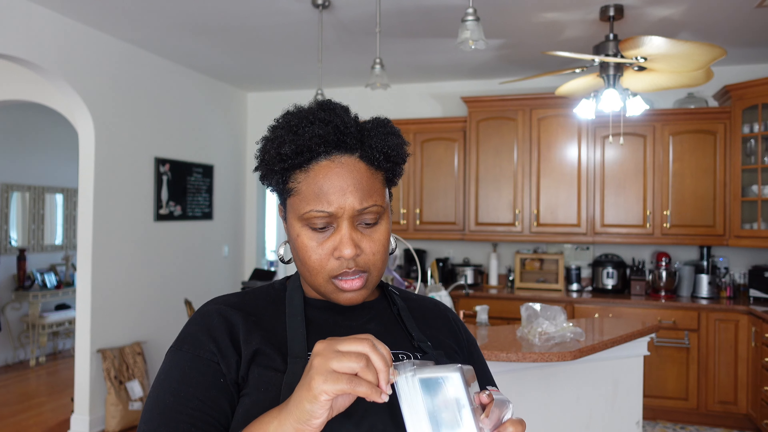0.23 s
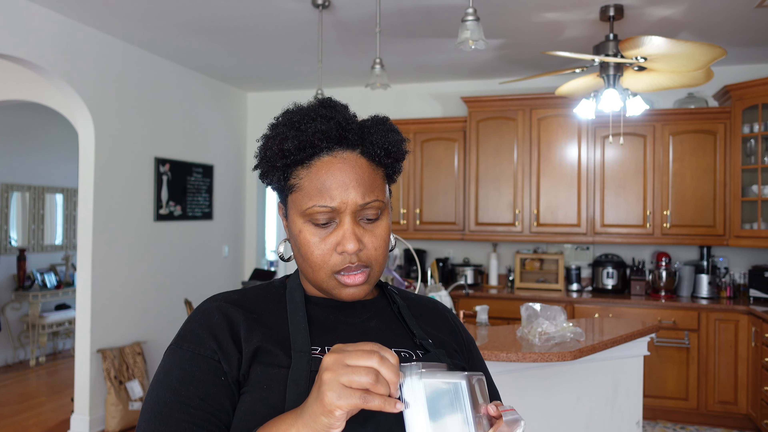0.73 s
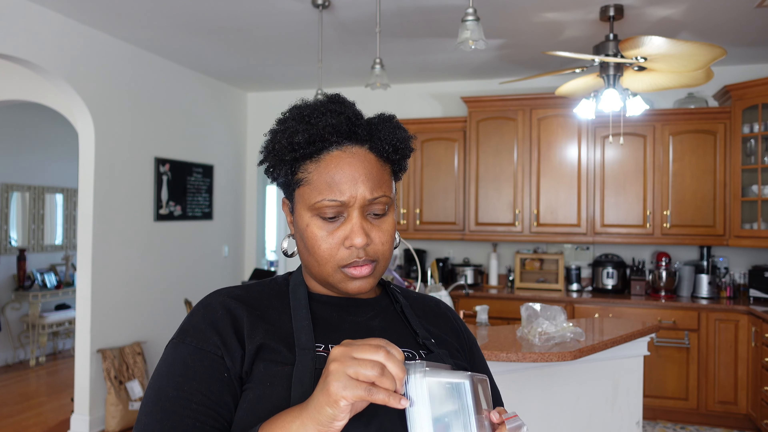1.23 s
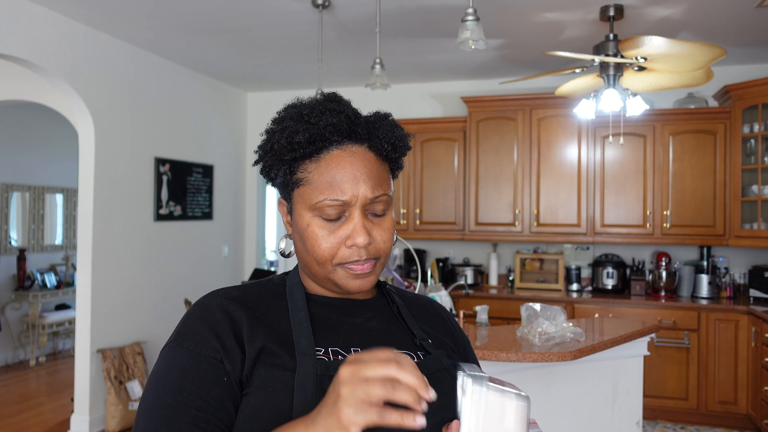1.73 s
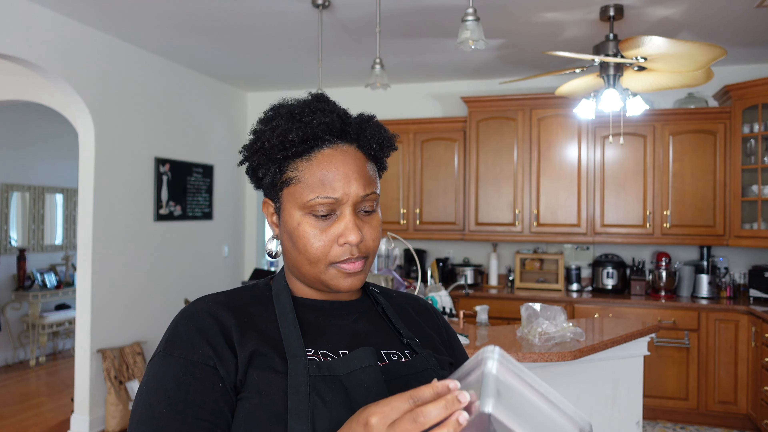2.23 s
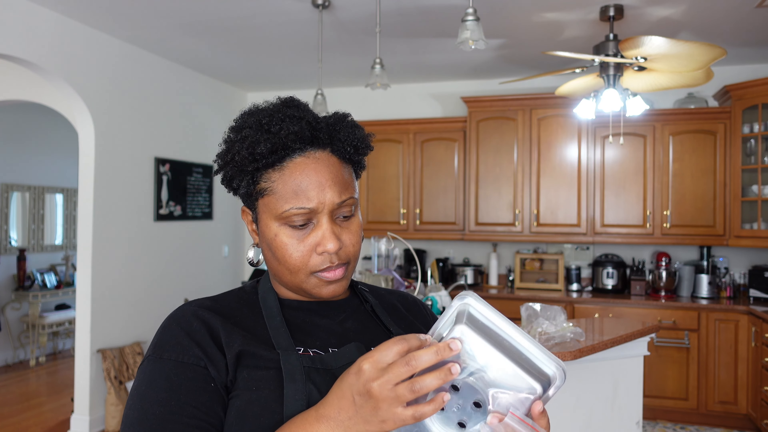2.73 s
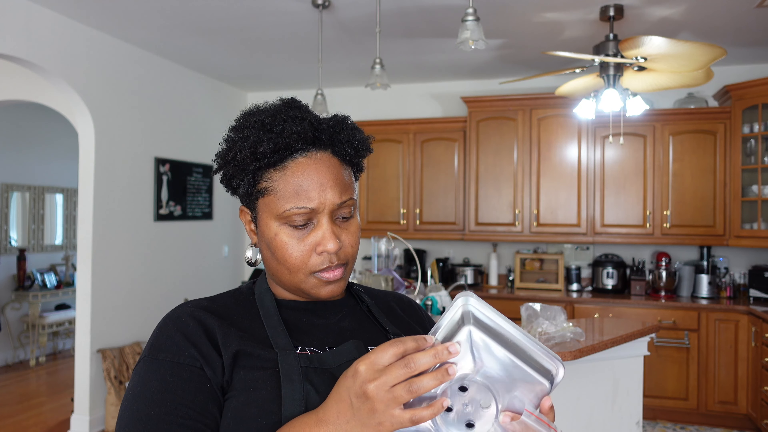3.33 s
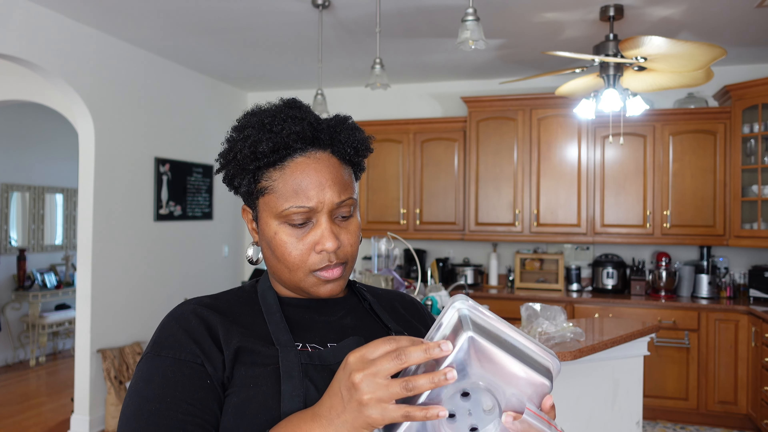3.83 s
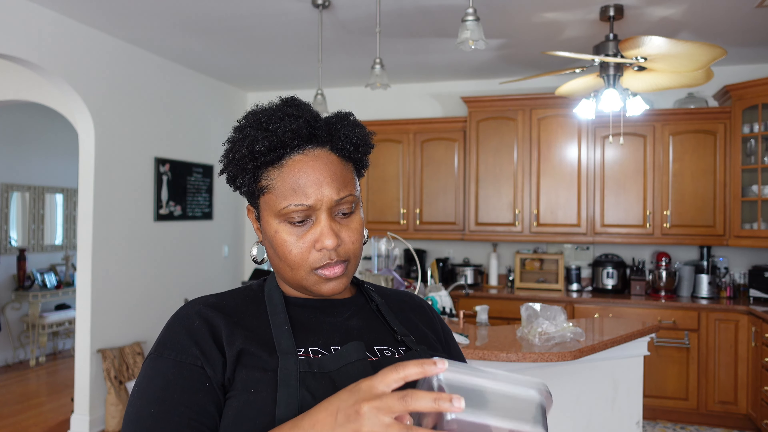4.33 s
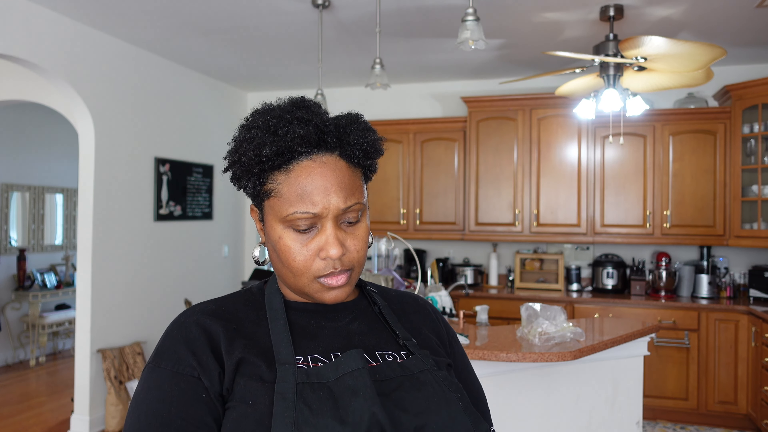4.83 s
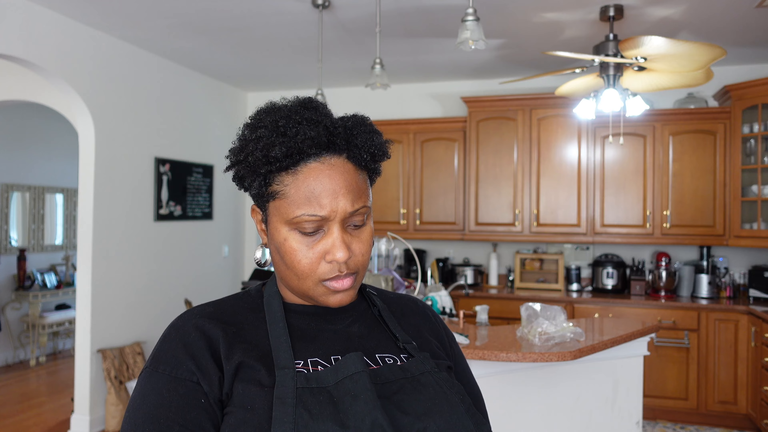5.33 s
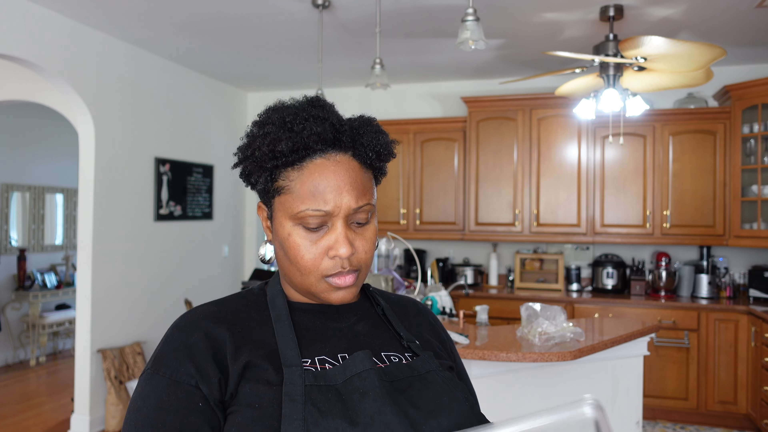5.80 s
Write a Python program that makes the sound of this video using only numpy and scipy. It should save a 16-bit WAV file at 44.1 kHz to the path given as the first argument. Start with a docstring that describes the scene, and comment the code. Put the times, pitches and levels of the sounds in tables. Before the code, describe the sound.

Thin plastic packaging and a light tray are turned over in the hands, clicking, snapping and sliding close by in a faintly humming kitchen.

```python
"""Thin plastic packaging and a tray are turned over in the hands, close to one microphone in a hard-walled kitchen.
Sliding and light clicks come first; panels snap from 0.5 s on, and at 1.5 s a snap comes with a bump of the tray.
A smaller part is knocked from 2 s on, hard snaps come near 3.8 and 4.1 s, and a dense run of them near 5.7 s.
Snaps are fluttering jumps through panel resonances, slides are friction noise, knocks are decaying modes.
Throughout, an appliance hums faintly in the room air, as a sum of sines over coloured noise."""
import sys
import numpy as np
from scipy import signal
from scipy.fft import rfft, irfft, next_fast_len
from scipy.io import wavfile

SR = 44100
rng = np.random.default_rng(int(sys.argv[2]) if len(sys.argv) > 2 else 0)


def to_wav(sig):
    """Store sig (one row per channel, or 1-D mono) as 16-bit WAV at the path in sys.argv[1].

    Samples outside -1..1 are clipped; the rate is SR.
    """
    pcm = np.clip(np.atleast_2d(sig), -1, 1) * 32767
    pcm = np.round(pcm).astype(np.int16)
    wavfile.write(sys.argv[1], SR, pcm.T)  # frames by channels


N = 267334
TIME = np.arange(N) / SR

# Panels that buckle; level is the energy at the pitch, and it falls away on either side of it:
# start_s, level_db, flutter_ms, pitch_hz, fall_below [dB/octave], fall_above [dB/octave], room_db
PANEL_SNAPS = [(0.5475, 4, 2.9, 2770, 5, 2, -4.5), (0.5542, -7.5, 1, 9300, 1.5, 6, -2.5),
               (0.9684, -9, 0.67, 8400, 4, 6, -6), (1.5121, 6, 2.5, 1075, 3.5, -1, -4.5),
               (1.551, -6, 2.8, 1960, 17, 1.5, 4.5), (1.568, -5, 1.4, 2200, 14, 10, -8),
               (1.5857, 5, 1.3, 2970, 4.5, 12, -13), (1.6115, 1, 1.4, 1050, 4.5, 2, -11),
               (2.2118, -2.5, 3.1, 1700, 6.5, 13, -6), (2.2932, 7.5, 5.1, 1810, 12, 8, -1.5),
               (2.3049, 5, 1.15, 6260, 4, 18, -0.5), (2.5002, 5, 0.48, 5200, 4.5, 15, -7.5),
               (2.5178, -6.5, 2.6, 4250, 1.5, 6, -11), (3.8327, 13, 0.48, 5120, 8.5, 11.5, -3.5),
               (4.0905, 12, 2.5, 6350, 5.5, 14.5, -3), (4.21, -10.5, 1.5, 6280, 2.3, 7, -1.5),
               (4.7495, 2, 4.8, 1340, 4, 13, -4), (4.764, 3.5, 4, 1360, 17, 5, -25),
               (5.1234, -4.5, 0.72, 5500, 2.5, 5.5, -4), (5.4057, 1.5, 3.7, 8600, 3.5, 14, -5.5),
               (5.6864, 8.5, 2.3, 1280, 4.5, 9.5, -4), (5.6939, 9, 3.5, 956, 6, 6, -2.5),
               (5.7329, 6, 5.2, 2350, 3, 2.5, -4), (5.749, 11.5, 6.4, 1940, 6, 8, -7),
               (5.822, 0, 5.5, 1750, 3.5, 8, -6), (5.832, 0.5, 5.4, 1820, 6.5, 10, -15)]


def snaps():
    """Snap-through buckling: all snaps as the microphone gets them, and as they are thrown into the room."""
    near, thrown = np.zeros(N), np.zeros(N)
    pulse = signal.unit_impulse(SR // 16) + 1e-18
    for start_s, level_db, flutter_ms, pitch_hz, fall_below, fall_above, room_db in PANEL_SNAPS:
        direct = snap(flutter(flutter_ms), pitch_hz, fall_below, fall_above)
        add(near, start_s, from_db(level_db) * direct)
        # over all directions the ripples of the flutter average out: the room gets only the panel's colour
        panel_colour = snap(pulse, pitch_hz, fall_below, fall_above)
        add(thrown, start_s, from_db(level_db + room_db) * panel_colour)
    return near, thrown


def snap(motion, pitch_hz, fall_below, fall_above, panel_q=7, overtone=1.58, overtone_share=0.12):
    """Plate resonance: the panel rings at its pitch and one overtone; energy falls away around the pitch."""
    gain = from_db(7.5)
    width_hz = pitch_hz / (panel_q * np.sqrt(gain))
    ring = resonance(motion, pitch_hz, width_hz)
    ring = ring + overtone_share * resonance(motion, overtone * pitch_hz, width_hz)
    octaves = np.log2(REGISTER_CENTRES_HZ / pitch_hz)
    energies_db = np.where(octaves < 0, fall_below, -fall_above) * octaves
    return in_registers(motion + (gain - 1) * ring, energies_db)


def flutter(flutter_ms, jump=2.77, ring_db=-25, ring_s=0.0037):
    """Bistable motion: a panel jumps through, then flutters irregularly for a moment."""
    t = TIME[:SR // 16]
    fade = np.exp(-t * 1000 / flutter_ms)
    afterring = from_db(ring_db) * np.exp(-t / ring_s)
    motion = rng.choice([-1, 1], len(t)) * (fade + afterring)
    motion[0] = jump
    return motion


# Edges of the frequency registers [Hz]
REGISTER_BOUNDS_HZ = [260, 700, 1700, 3800, 8000, 11500, 16000]
REGISTER_CENTRES_HZ = np.sqrt(np.multiply(REGISTER_BOUNDS_HZ[:-1], REGISTER_BOUNDS_HZ[1:]))
# the half-octave registers hold half the energy
REGISTER_SHARES = np.minimum(np.diff(np.log2(REGISTER_BOUNDS_HZ)), 1)
REGISTER_FILTERS = [signal.butter(3, edges, "band", fs=SR)
                    for edges in zip(REGISTER_BOUNDS_HZ, REGISTER_BOUNDS_HZ[1:])]


def in_registers(sound, energies_db):
    """Band energies: give each register of a short sound its energy."""
    gains = from_db(energies_db) * np.sqrt(REGISTER_SHARES)
    return sum(gain * unit_energy(signal.lfilter(b, a, sound + 1e-18))
               for gain, (b, a) in zip(gains, REGISTER_FILTERS))


# Large walls that ring on after they pop: start_s, pitch_hz, level_db, t60_s
POPPED_WALLS = [(0.5476, 2930, -10.5, 0.0095), (0.548, 2470, -16.5, 0.014), (0.5483, 4280, -19.5, 0.009),
                (0.5493, 318, -39, 0.16), (0.5542, 8900, -14, 0.002), (0.9738, 7160, -26, 0.003),
                (1.5133, 1034, -12.5, 0.034), (1.5139, 1720, -15, 0.012), (2.3057, 975, -20.5, 0.04),
                (3.8329, 4750, -8.5, 0.0023), (4.091, 1380, -18, 0.017), (4.091, 710, -28, 0.03)]


def walls():
    """Free vibration: a whole wall that pops over gives a short pitched ring."""
    out = np.zeros(N)
    for start_s, pitch_hz, level_db, t60_s in POPPED_WALLS:
        add(out, start_s, mode(pitch_hz, level_db, t60_s))
    return out


# Bare clicks of a crease or an edge: start_s, level_db, brightness [dB/octave]
CREASE_TICKS = [(0.2367, -13.5, -0.5), (0.3179, -21, -4), (0.3534, -13.5, -4), (0.6992, -18, 3),
                (1.126, -15.5, -1.5), (1.1342, -18.5, -2.5), (1.196, -18.5, -2.5), (1.2646, -13.5, -0.3),
                (1.87, -30.5, 9.5), (2.0319, -11, 6), (2.141, -13.5, 0.5), (2.1444, -13.5, 0.5),
                (2.1957, -9.5, -2), (2.22, -15.5, 2), (2.235, -20, 5.5), (2.3985, -9.5, -0.5),
                (2.634, -20, 3), (3.3085, -32, 5), (3.3855, -23.5, 2), (3.6995, -24, 1),
                (3.7472, -22.5, 0.5), (3.9451, -4, -1), (3.961, -21, 9), (3.9783, -11.5, 2),
                (3.9965, -12, 1.5), (4.822, -19, 2), (4.8605, -16, 3), (5.447, -18, -5),
                (5.469, -16.5, 0.5), (5.476, -15, -0.5), (5.531, -13.5, 0), (5.6442, -14, 2.5),
                (5.666, -16, 1)]
# Colour common to the clicks: frequency_hz, level_db
CLICK_COLOUR = [(430, -12), (1100, -5.5), (2500, -1), (5500, 1.5), (11300, -5)]


def ticks(flutter_ms=0.45, tilt_pivot_hz=2500):
    """Impulsive excitation: clicks too light to set a panel ringing, one colour tilted brighter or duller."""
    out = np.zeros(N)
    colour_db = at_hz(CLICK_COLOUR, REGISTER_CENTRES_HZ)
    octaves = np.log2(REGISTER_CENTRES_HZ / tilt_pivot_hz)
    for start_s, level_db, brightness in CREASE_TICKS:
        energies_db = level_db + colour_db + brightness * octaves
        add(out, start_s, in_registers(flutter(flutter_ms), energies_db))
    return out


# Colouring of snaps and clicks in the treble: frequency_hz, width_hz, level_db
TREBLE_RESONANCES = [(9000, 900, 3.5), (10900, 2000, -3.5), (13300, 880, 0)]


def treble_colour(x):
    """Resonant filtering: every snap and click is coloured in the treble."""
    for frequency_hz, width_hz, level_db in TREBLE_RESONANCES:
        x = x + (from_db(level_db) - 1) * resonance(x + 1e-18, frequency_hz, width_hz)
    return x


# Spectra of rubbing, scraping, crinkling and the crackle of creases: frequency_hz, density [dB per Hz]
RUB_SPECTRUM = [(200, -8), (400, 0), (700, 5.5), (1300, 2.5), (2200, -1.5), (3500, -10.5)]
SCRAPE_SPECTRUM = [(1600, -14), (2700, -0.5), (4500, 0), (7000, -2.5), (8700, -7), (10500, -20),
                   (13000, -22)]
CRINKLE_SPECTRUM = [(6500, -20), (8800, 7.5), (10700, -9.5), (13500, 0.5), (16000, -6)]
CRACKLE_SPECTRUM = [(900, 9), (2500, -4), (5500, -9), (8500, 11), (11000, -8), (15000, -13)]
CRINKLE_PER_BITE = 0.78   # dB of crinkle for each dB of bite
GRIP_CHANGES_PER_S, GRIP_DB = 70, 2.5   # the grip catches and lets go
CRACKLES_PER_S, CRACKLE_DB = 51, -11   # tiny creases give way; level against the scraping's envelope


def handling(rub_db=-3.5, scrape_db=-2.0, crinkle_db=-7.0):
    """Stick-slip under an uneven grip: more bite turns rubbing into scraping, crinkling and crackles."""
    grip_db = GRIP_DB * np.interp(TIME * GRIP_CHANGES_PER_S, np.arange(N), rng.standard_normal(N))
    grip = from_db(grip_db)
    rub, scrape, crinkle = [grip * sliding_level(share) for share in (0, 1, CRINKLE_PER_BITE)]
    rubbing = from_db(rub_db) * friction(RUB_SPECTRUM, slips_per_s=700, size_db=6, smooth=0.98)
    scraping = from_db(scrape_db) * friction(SCRAPE_SPECTRUM, slips_per_s=1700, size_db=9, smooth=0.6)
    crinkling = from_db(crinkle_db) * friction(CRINKLE_SPECTRUM, slips_per_s=520, size_db=4, smooth=0.7)
    crackles = from_db(CRACKLE_DB) * friction(CRACKLE_SPECTRUM, CRACKLES_PER_S, size_db=2.5, smooth=0)
    return rub * rubbing + scrape * (scraping + crackles) + crinkle * crinkling


def friction(spectrum, slips_per_s, size_db, smooth):
    """Stick-slip noise: tiny slips of uneven size over a smooth hiss; rms 1."""
    sizes = from_db(size_db * np.minimum(rng.exponential(1, N), 3)) * rng.choice([-1, 1], N)
    slips = rms_one(sizes * (rng.random(N) < slips_per_s / SR))
    return coloured(slips + smooth * rng.standard_normal(N), spectrum)


# Slides of a finger or a part over the plastic; bite is low for a soft fingertip, high for a hard edge:
# start_s, length_s, level_db, bite_db
SLIDES = [(0.0, 0.28, -47, -20), (0.21, 0.18, -47.5, -8), (0.41, 0.29, -52, -37), (1.135, 0.09, -47, -13),
          (1.43, 0.14, -55.5, -12), (1.525, 0.12, -30, -10), (1.85, 0.14, -42.5, -4),
          (1.966, 0.16, -38.5, -2.5), (2.16, 0.15, -42.5, -5), (2.51, 0.15, -38.5, -14),
          (2.805, 0.093, -48.5, -13), (3.02, 0.1, -62, -14), (3.91, 0.047, -47, -2),
          (4.095, 0.098, -42.5, 5), (4.42, 0.046, -38.5, -16), (4.46, 0.082, -53, -4),
          (4.565, 0.25, -39, -5.5), (4.73, 0.088, -32, -22), (4.8, 0.15, -48, 1),
          (4.92, 0.071, -43.5, -0.5), (5.06, 0.15, -47, -9), (5.15, 0.15, -45, 0), (5.29, 0.14, -45.5, 1),
          (5.415, 0.16, -42.5, -1.5), (5.573, 0.12, -36, 0), (5.689, 0.15, -27, -7),
          (5.98, 0.14, -54.5, -6)]
HOLD_DB, HOLD_BITE_DB = -58.5, -7   # the hands never rest entirely


def sliding_level(bite_share):
    """Friction power follows the slide: one kind's level; the share says how much it grows with bite."""
    level = np.full(N, from_db(HOLD_DB + bite_share * HOLD_BITE_DB))
    for start_s, length_s, level_db, bite_db in SLIDES:
        add(level, start_s, from_db(level_db + bite_share * bite_db) * stroke(length_s))
    return level


def stroke(length_s, rise=0.25, fall=0.4):
    """Sliding speed: it gathers smoothly, holds and slows to a stop; rise and fall are shares of the length."""
    progress = np.linspace(0, 1, int(length_s * SR))
    speed = np.clip(np.minimum(progress / rise, (1 - progress) / fall), 0, 1)
    return speed * speed * (3 - 2 * speed)


# Blunt bumps of the tray, and knocks of a smaller hollow part: start_s, level_db
TRAY_BUMPS = [(1.5135, -24.5), (5.689, -7.5), (5.741, -29)]
SMALL_PART_KNOCKS = [(1.974, -37), (2.501, -30.5), (4.7515, -25.5), (4.7675, -23.5)]
# Modes of the whole tray flexing, and of the smaller part: pitch_hz, level_db, t60_s
TRAY_MODES = [(80, -15, 0.095), (117, -17, 0.074), (168, -18, 0.14), (212, -18.5, 0.068), (270, -26, 0.069),
              (460, -12.5, 0.2), (640, -16, 0.09), (743, -9, 0.03), (813, -6, 0.05), (895, -4.5, 0.046),
              (975, -10, 0.062), (1343, -1, 0.024)]
SMALL_PART_MODES = [(337, -7.5, 0.054), (411, -3, 0.044), (583, -9, 0.04), (678, -0.5, 0.061),
                    (1098, -11, 0.038), (1366, -2, 0.07), (1760, -2, 0.041), (2020, 4, 0.023)]


def knocks(contacts, modes):
    """Modal superposition: each blunt contact sets all of a body's modes ringing."""
    out = np.zeros(N)
    for start_s, contact_db in contacts:
        for k, (pitch_hz, level_db, t60_s) in enumerate(modes):
            sign = (-1) ** k   # neighbouring modes start in opposite phase
            add(out, start_s, sign * mode(pitch_hz, contact_db + level_db, t60_s))
    return out


def mode(pitch_hz, level_db, t60_s):
    """Damped oscillation: a struck mode is a sine that dies away exponentially."""
    t = TIME[:SR // 3]
    decay = np.exp(-np.log(1000) * t / t60_s)
    return from_db(level_db) * decay * np.sin(2 * np.pi * pitch_hz * t)


# Reverberation time of the room: frequency_hz, t60_s
ROOM_DECAY = [(150, 0.34), (400, 0.46), (1000, 0.74), (2000, 0.75), (5500, 0.59), (9000, 0.56),
              (15000, 0.32)]
# Colour of the reverberation: frequency_hz, level_db
REVERB_COLOUR = [(150, -4.5), (400, -1), (1000, 1), (2500, -1), (4000, -3), (6500, 0), (8800, -3),
                 (11500, -1), (15000, -7)]


def kitchen(x, first_s=0.0011, build_s=0.00066):
    """Diffuse reverberation: a dense tail builds up quickly and decays at a rate set by frequency."""
    t = TIME[:int(.8 * SR)]
    build_up = 1 - np.exp(-np.maximum(t - first_s, 0) / build_s)
    edges_hz = np.geomspace(70, 18000, 17)
    tail = 0
    for low, high in zip(edges_hz, edges_hz[1:]):
        centre_hz = np.sqrt(low * high)
        decay = np.exp(-np.log(1000) * t / at_hz(ROOM_DECAY, centre_hz))
        share = np.sqrt(2 * (high - low) / SR) * from_db(at_hz(REVERB_COLOUR, centre_hz))
        noise = rng.standard_normal(len(t)) * decay * build_up
        tail = tail + share * unit_energy(band(noise, low, high))
    return signal.fftconvolve(x, tail)[:N]


# Spectrum of the still room: frequency_hz, density [dB per Hz]
AIR_SPECTRUM = [(25, 3), (36, -9.5), (50, -4), (75, -14), (100, -13), (130, -4), (210, -8), (300, -7.5),
                (550, -9), (1070, -15), (2760, -24.5), (6200, -35.5), (16000, -37.5)]
# Partials of the appliance's hum: pitch_hz, level_db (rms)
HUM_PARTIALS = [(48.4, -62.5), (119.5, -63.5), (270, -59), (345, -69), (536, -72.5)]


def background(air_db=-50.5, waver_rad=0.4):
    """Stationary noise and tones: room air, and a hum whose phases wander slightly."""
    out = from_db(air_db) * coloured(rng.standard_normal(N), AIR_SPECTRUM)
    for pitch_hz, level_db in HUM_PARTIALS:
        wander = np.cumsum(rng.standard_normal(30))
        waver = np.interp(TIME, np.linspace(0, TIME[-1], 30), wander)
        phase = 2 * np.pi * pitch_hz * TIME + waver_rad * waver
        out = out + np.sqrt(2) * from_db(level_db) * np.sin(phase)
    return out


def from_db(db):
    """Logarithmic level: decibels to amplitude gain."""
    return 10 ** (np.asarray(db) / 20)


def rms_one(x):
    """Normalised power: scale to an rms of 1."""
    return x / np.sqrt(np.mean(x ** 2) + 1e-20)


def unit_energy(x):
    """Normalised energy: scale to an energy of 1."""
    return x / np.sqrt(np.sum(x ** 2) + 1e-20)


def at_hz(points, hz):
    """Logarithmic pitch: read a table on a log-frequency axis."""
    frequencies_hz, values = np.transpose(points)
    return np.interp(np.log(hz + 1e-3), np.log(frequencies_hz), values)


def band(x, low, high, order=3):
    """Band limitation: a causal band-pass."""
    return signal.sosfilt(signal.butter(order, [low, high], "band", fs=SR, output="sos"), x + 1e-18)


def coloured(x, spectrum):
    """Spectral shaping: give a steady signal a spectrum that falls away beyond its ends; rms 1."""
    size = next_fast_len(N)
    hz = np.arange(size // 2 + 1) * SR / size + 1e-3
    low_skirt = 1 / (1 + (spectrum[0][0] / hz) ** 4)
    high_skirt = 1 / (1 + (hz / spectrum[-1][0] / 2) ** 8)
    gain = from_db(at_hz(spectrum, hz)) * low_skirt * high_skirt
    return rms_one(irfft(rfft(x, size) * gain, size)[:N])


def resonance(x, hz, width_hz):
    """Simple resonator: two poles, with gain 1 on top."""
    r = np.exp(-np.pi * width_hz / SR)
    zeros = np.array([1, 0, -1]) * (1 - r * r) / 2
    poles = [1, -2 * r * np.cos(2 * np.pi * hz / SR), r * r]
    return signal.lfilter(zeros, poles, x)


def add(track, start_s, sound):
    """Superposition: mix a sound in at a time."""
    start = round(start_s * SR)
    track[start:start + len(sound)] += sound[:N - start]


def scene(tick_room_db=-6.5, handling_room_db=-3, knock_room_db=-4, echo_s=.0053, echo_db=-17):
    """Direct sound, an echo off a near surface and reverberation, the same in both channels."""
    near, thrown = snaps()
    clicks, sliding, rung = ticks(), handling(), walls()
    knocked = knocks(TRAY_BUMPS, TRAY_MODES) + knocks(SMALL_PART_KNOCKS, SMALL_PART_MODES)
    direct = treble_colour(near + clicks) + rung + sliding + knocked
    echo = from_db(echo_db) * np.interp(TIME - echo_s, TIME, direct, left=0)
    into_room = (thrown + rung + from_db(tick_room_db) * clicks
                 + from_db(handling_room_db) * sliding + from_db(knock_room_db) * knocked)
    return np.tile(direct + echo + kitchen(into_room) + background(), (2, 1))


def record(dry, soft_top_hz=14800, cutoff_hz=15950):
    """Transducer limits: the microphone's top rolls off, the input clips at full scale, the top is cut."""
    roll_off = signal.butter(2, soft_top_hz, fs=SR, output="sos")
    heard = signal.sosfilt(roll_off, dry)
    top_cut = signal.ellip(10, .1, 70, cutoff_hz, fs=SR, output="sos")
    return signal.sosfilt(top_cut, np.clip(heard, -1, 1))


dry = scene()
out = record(dry)
to_wav(out)
```